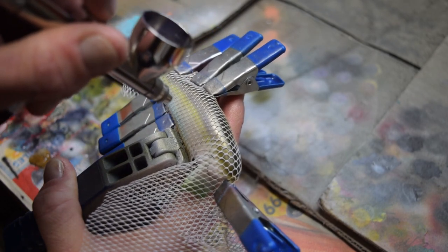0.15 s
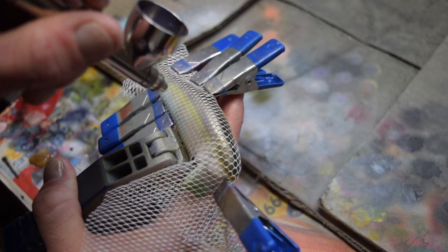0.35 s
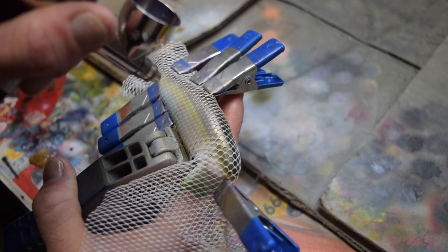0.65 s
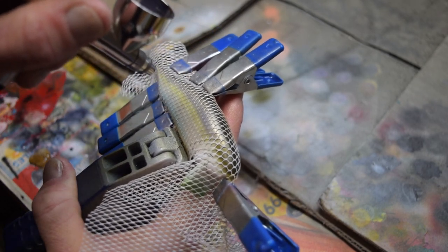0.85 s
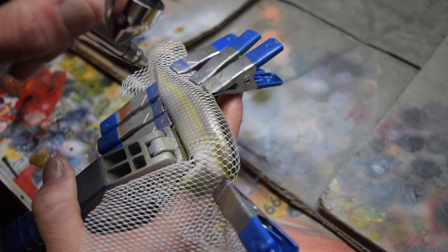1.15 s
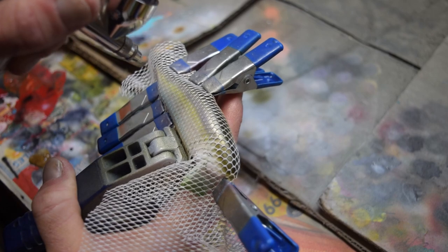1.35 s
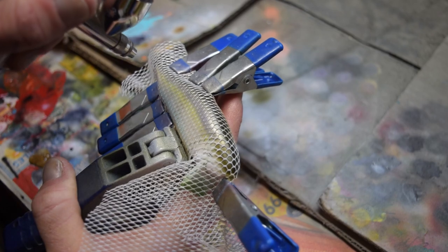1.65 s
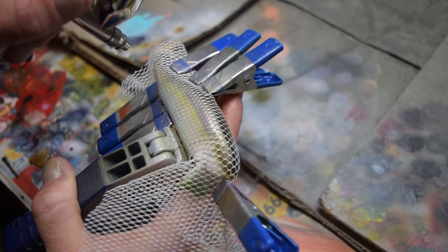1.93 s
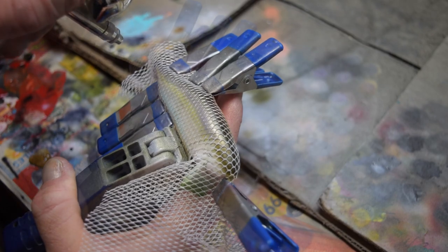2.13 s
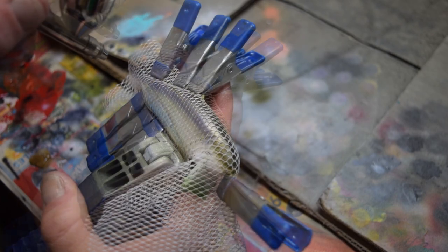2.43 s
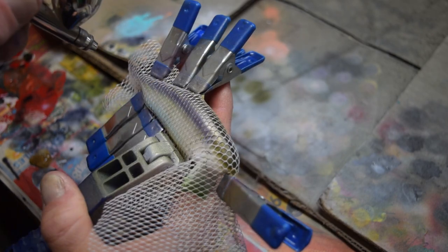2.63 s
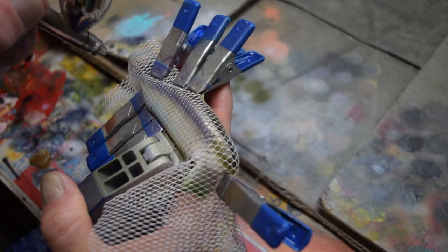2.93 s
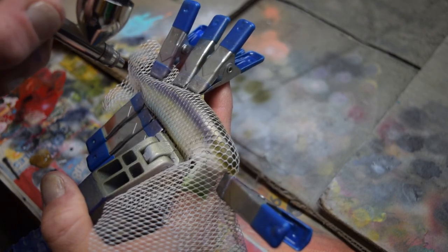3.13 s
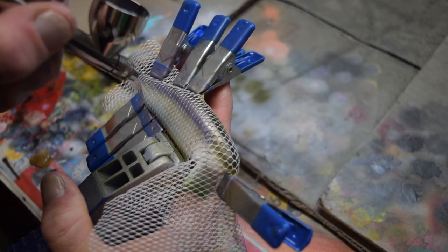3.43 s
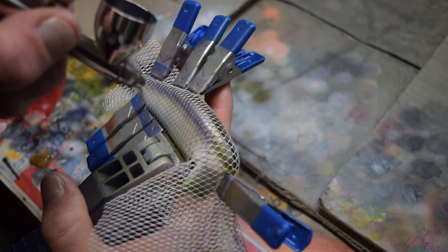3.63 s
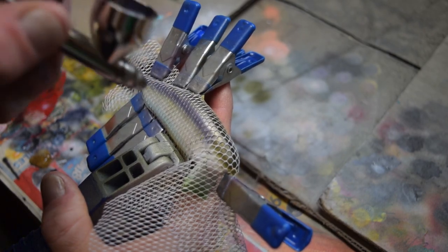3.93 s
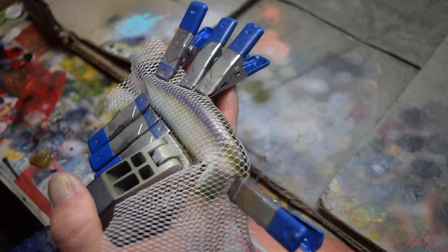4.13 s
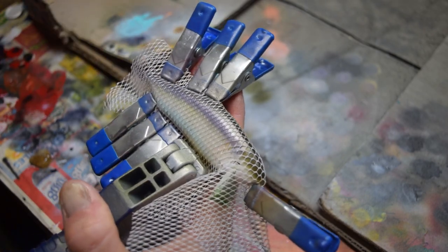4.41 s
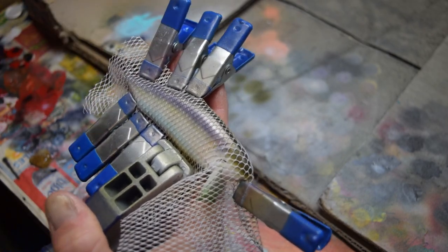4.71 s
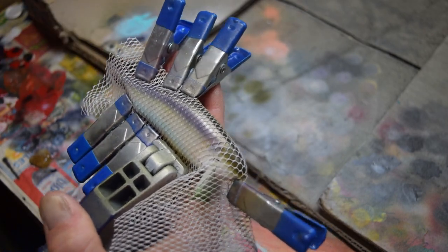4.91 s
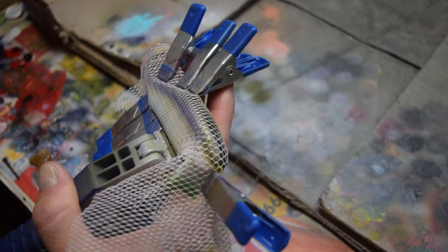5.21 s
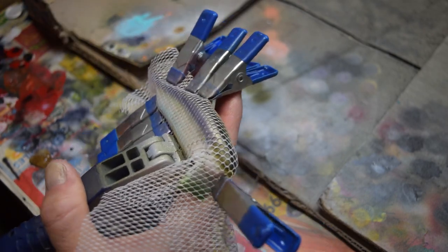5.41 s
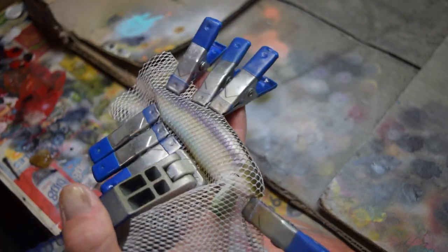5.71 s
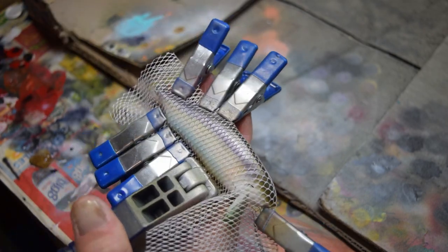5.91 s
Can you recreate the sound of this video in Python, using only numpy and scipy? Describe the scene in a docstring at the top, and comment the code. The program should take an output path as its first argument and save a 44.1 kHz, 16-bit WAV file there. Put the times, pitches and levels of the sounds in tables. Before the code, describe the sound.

Close airbrush spray rushes and wavers against a mesh-covered lure and metal clamps, then cuts off while a small compressor keeps buzzing steadily.

```python
"""At first an airbrush spray, a piston compressor chugging nearby and the workshop all swirl, wide and phasey.
Just before one second the sound snaps to the centre, louder and brighter: shaped noise hisses at the nozzle,
and a lower noise rushes where the jet strikes a mesh-wrapped lure and its clamps, following the aim.
Just before four seconds the trigger is let go. A thin hiss lingers, and the compressor runs on alone:
harmonics of its shaft, noise puffed through the valves, buzzing fittings and loose metal over hum and room noise."""
import sys
import numpy as np
from scipy import signal
from scipy.fft import rfft, irfft
from scipy.io import wavfile
from scipy.ndimage import uniform_filter1d

SR = 44100
rng = np.random.default_rng(int(sys.argv[2]) if len(sys.argv) > 2 else 0)


def store_pcm(level_fs):
    """Save levels as 16-bit WAV."""
    pcm = np.round(np.clip(level_fs, -1, 1) * 32767).astype(np.int16)
    wavfile.write(sys.argv[1], SR, np.atleast_2d(pcm).T)


N = 267246
T = np.arange(N) / SR  # s
FRAME_T, BIN_HZ = np.arange(N // 256 + 5) * 256 / SR, np.fft.rfftfreq(1024, 1 / SR)  # s, Hz
SNAP_S, RELEASE_S = .918, 3.931  # the sound snaps to the centre; the trigger is let go


def amp(db):
    """Decibels to gain."""
    return 10 ** (np.asarray(db) / 20)


def unit(x):
    """Scales to an rms of 1."""
    return x / np.sqrt(np.mean(x ** 2) + 1e-20)


def curve(rows, t):
    """Joins (t/s, value) rows by straight lines."""
    return np.interp(t, *np.transpose(rows))


def during(t, start, end, fade):
    """1 between start and end, with linear fades centred on both."""
    return np.clip(np.minimum(t - start, end - t) / fade + .5, 0, 1)


def shape(points):
    """Gain per bin of a spectrum given as (f/Hz, level/dB) points."""
    hz, db = np.transpose(points)
    return amp(np.interp(np.log(BIN_HZ + 1), np.log(hz), db))


def noise(gain):
    """Noise of unit power, coloured by a gain per bin, or per frame and bin."""
    real, imaginary = rng.standard_normal((2, len(FRAME_T), len(BIN_HZ)))
    spectrum = (real + 1j * imaginary) * gain
    return unit(signal.istft(spectrum.T, nperseg=1024, noverlap=768)[1][:N])


def wander(hz):
    """Smooth random drift of unit rms, with a Gaussian roll-off that reaches 1/e at hz."""
    roll_off = np.exp(-(np.fft.rfftfreq(N, 1 / SR) / hz) ** 2)
    return unit(irfft(rfft(rng.standard_normal(N)) * roll_off, N))


STEP_FADE_S = .006  # length of the step in level at the snap


def centred():
    """Rises from 0 to 1 as the sound snaps to the centre."""
    return np.clip((T - SNAP_S) / STEP_FADE_S + .5, 0, 1)


# air through the nozzle, before its gain: t/s, level/dB
JET = [(0.94, -42.5), (1.26, -42), (2.13, -45), (2.32, -45.5), (2.56, -40.5), (3.05, -41), (3.13, -41.5),
       (3.92, -41)]
# how squarely the jet strikes the work, as the rush before its gain: t/s, level/dB
AIM = [(0.94, -39.5), (1.26, -38.5), (1.4, -37.5), (1.67, -39.5), (1.82, -34.5), (2.09, -36), (2.27, -48.5),
       (2.59, -36), (2.75, -47), (2.85, -40.5), (2.91, -35), (3.09, -38), (3.4, -40.5), (3.49, -44.5),
       (3.83, -46), (3.92, -47)]
# spectrum of the nozzle's hiss: f/Hz, relative level/dB
NOZZLE = [(100, -19), (500, -8.5), (1000, 3), (2500, -10), (4500, -17.5), (6200, -9), (7600, -2),
          (9500, -9), (11200, -6.5), (12300, -5), (13400, -0.5), (14600, -8.5), (16000, -3.5)]
# spectrum of the rush on the work: f/Hz, relative level/dB
RUSH = [(60, -14.5), (200, -16.5), (420, -13.5), (700, -9.5), (1000, 2.5), (1350, 2.5), (1550, -9.5),
        (1850, 2.5), (2600, -0.5), (3300, -2), (4800, -3.5), (6300, -8), (9000, -22), (16000, -16)]
# spectrum of the rush's bright edge: f/Hz, relative level/dB
EDGE = [(2000, -26.5), (4500, -2), (6200, -4.5), (7600, -4.5), (9000, -1), (11000, -6.5), (16000, -22)]
# the jet catches an edge of the mesh: t/s, length/s, extra level/dB of the rush
SPURTS = [(1.382, 0.0036, 4), (1.456, 0.0069, 2), (2.987, 0.0026, 5.5)]
HISS_GAIN_DB, RUSH_GAIN_DB = 4.5, 1.5
# the bright edge follows the aim late and less deeply: level at the best aim (dB), share, lag (s)
EDGE_DB, EDGE_FOLLOW, EDGE_LAG_S = -39, 0.8, 0.033
# the quieter spray before the snap: changes of level (dB), sag (dB/s), and where the rush loses its treble (Hz)
EARLY_JET_DB, EARLY_RUSH_DB, EARLY_EDGE_DB = -1.5, -3, -6.5
EARLY_SAG_DB_PER_S, EARLY_DULL_HZ = 2, 4470
SHUT_S = .009  # the valve shuts to 1/e in this time


def airbrush():
    """Nozzle hiss, plus the turbulent rush of the jet on the work, both cut off by the air valve."""
    colour, early = work_colour(), 1 - centred()
    dull = 1 / np.sqrt(1 + np.outer(FRAME_T < SNAP_S, (BIN_HZ / EARLY_DULL_HZ) ** 6))

    hiss = noise(shape(NOZZLE)) * amp(curve(JET, T) + HISS_GAIN_DB + EARLY_JET_DB * early)
    rush_db = curve(AIM, T) + RUSH_GAIN_DB + EARLY_RUSH_DB * early
    rush = noise(shape(RUSH) * colour * dull) * amp(rush_db)
    late_aim_db = curve(AIM, T - EDGE_LAG_S)
    edge_db = EDGE_DB + EDGE_FOLLOW * (late_aim_db - late_aim_db.max()) + EARLY_EDGE_DB * early
    edge = noise(shape(EDGE) * colour) * amp(edge_db)

    flutter_db = 0.41 * wander(hz=45) + 0.37 * wander(hz=410)  # eddies and paint droplets
    for start, length, db in SPURTS:
        flutter_db += db * np.exp(-((T - start) / length) ** 2)
    spray = hiss * amp(0.64 * flutter_db) + (rush + edge) * amp(flutter_db)

    sag = amp(EARLY_SAG_DB_PER_S * (SNAP_S / 2 - T) * early)
    valve = np.exp(-np.maximum(T - RELEASE_S, 0) / SHUT_S)
    return sag * valve * bench(spray)


# ringing gaps between lure and clamps: f/Hz, half width/Hz at 1/e, level/dB at the peak
GAP_MODES = [(2640, 123, 3), (3977, 150, 5), (4960, 160, 2.5), (5640, 170, 5), (7400, 510, 4.5)]
NOTCH_SPACING_HZ, CLOSE_ECHO = 1560, .33  # short echo close on the lure: notch spacing, gain
# a square hit roars around one pitch: centre, half width at 1/e, gain for each dB of aim
ROAR_HZ, ROAR_WIDTH_HZ, ROAR_PER_DB = 2800, 600, 0.33


def work_colour():
    """Gain per frame and bin: notches close on the lure, ringing gaps elsewhere, a roar that grows with the aim."""
    close, aim_db = close_on_lure(FRAME_T)[:, None], curve(AIM, FRAME_T)
    notches = abs(1 - CLOSE_ECHO * close * np.exp(-2j * np.pi * BIN_HZ / NOTCH_SPACING_HZ))
    ring_db = sum(db * np.exp(-((BIN_HZ - hz) / width) ** 2) for hz, width, db in GAP_MODES)
    roar_band = np.exp(-((BIN_HZ - ROAR_HZ) / ROAR_WIDTH_HZ) ** 2)
    roar_db = ROAR_PER_DB * np.outer(aim_db - aim_db.mean(), roar_band)
    return notches * amp((1 - close) * (ring_db + roar_db))


def close_on_lure(t):
    """Rises to 1 while the jet plays close on the lure."""
    return during(t, start=1, end=1.3, fade=0.3)


def bench(x, echo_db=-15, count=14):
    """Early echoes from hand and bench, within 14 ms, put a fine ripple on the spray."""
    taps = np.zeros(round(.014 * SR))
    at = rng.integers(len(taps) // 10, len(taps), count)
    taps[at] = rng.choice([-1, 1], count) * amp(echo_db) / np.sqrt(count)
    taps[0] = 1  # direct sound
    return signal.oaconvolve(x, taps / np.linalg.norm(taps))[:N]


LINGER_DB, LINGER_HZ, LINGER_WIDTH_HZ = -70, 7950, 250  # level, centre, half width at half amplitude
LINGER_S, LINGER_FADE_S = .33, .1


def linger():
    """A thin, high band of noise that hangs on for a moment after the spray stops."""
    thin = noise(1 / (1 + ((BIN_HZ - LINGER_HZ) / LINGER_WIDTH_HZ) ** 2))
    return amp(LINGER_DB) * thin * during(T, RELEASE_S, RELEASE_S + LINGER_S, fade=LINGER_FADE_S)


# compressor shaft: t/s, f/Hz (turns per second)
SPEED = [(0, 27.18), (2.3, 27.18), (2.6, 27.205), (4.2, 27.205), (4.87, 27.176), (5.5, 27.165)]


def shaft_turns():
    """Turns of the shaft so far: its speed summed over time, with a slight waver."""
    return np.cumsum(curve(SPEED, T)) / SR + .0005 * wander(hz=13)


# piston and valve knocks within one turn: share of the turn, relative level/dB
KNOCKS = [(.094, -7), (.2411, -15), (.3286, 0), (.4175, -8), (.5406, 0), (.8044, -13)]


def knock_spectrum(order):
    """What the knocks of one turn give to each multiple of the shaft speed."""
    return sum(amp(db) * np.exp(-2j * np.pi * order * at) for at, db in KNOCKS)


def each_turn(harmonics, turns, size=2048):
    """Plays the same stroke, given by its harmonics, once per turn of the shaft."""
    stroke = irfft(harmonics, size) * size / 2
    return np.interp(turns % 1 * size, np.arange(size + 1), np.append(stroke, stroke[0]))


# tones of the compressor: multiple of the shaft speed, level/dB (peak, before the pump's gain)
ORDERS = [(1, -69), (2, -63.5), (3, -57.5), (7, -65.5), (8, -71.5), (10, -62.5), (19, -80), (21, -59),
          (22, -72.5), (24, -63), (26, -71.5), (28, -62), (30, -56.5), (31, -61), (32, -81), (33, -60),
          (34, -89), (35, -50.5), (36, -54.5), (37, -56.5), (38, -49.5), (39, -55), (41, -58), (42, -52.5),
          (43, -53), (44, -53), (45, -54.5), (46, -65), (47, -64), (48, -58.5)]
WEAK_ORDER_DB, PUMP_GAIN_DB = -76, 1.5  # level of the unlisted multiples; gain of all tones
BODY_HZ, BODY_WIDTH_HZ = 1030, 120  # main resonance that the knocks excite
SOFT_KNOCK_DB = -7  # change of the highest tone at the start


def pump(turns, count=48):
    """Knocks in a ringing body time the shaft's harmonics, which harden steadily while air is drawn off."""
    order, levels = np.arange(count + 1), dict(ORDERS)
    body = 1 / (1 + 2j * (order * SPEED[0][1] - BODY_HZ) / BODY_WIDTH_HZ) ** 2
    level = amp([levels.get(k, WEAK_ORDER_DB) for k in order]) * (order > 0)
    hard = level * np.exp(1j * np.angle(knock_spectrum(order) * body))
    soft = hard * amp(SOFT_KNOCK_DB * order / count)
    softness = np.maximum(1 - T / RELEASE_S, 0)
    tones = softness * each_turn(soft, turns) + (1 - softness) * each_turn(hard, turns)
    return tones * amp(PUMP_GAIN_DB + .1 * wander(hz=25))


# ringing of the compressor's housing: f/Hz, width/Hz, relative level/dB
HOUSING = [(975, 108, -2.5), (1236, 49, -5), (1724, 34, -1.5), (2208, 69, -9), (2490, 56, -13.5),
           (2680, 45, -25.5), (2975, 66, -23), (3820, 114, -15.5), (5240, 230, -23), (7900, 400, -32)]
RING_DB, RING_WAVER = -57, 0.0028  # level; waver of the timing (turns, rms)


def housing_ring(turns, count=120):
    """The same knocks ring the upper modes of the housing, alike on every turn."""
    order = np.arange(count)
    modes = sum(amp(db) / (1 + 2j * (order * SPEED[0][1] - hz) / width) for hz, width, db in HOUSING[2:])
    above_pump = order > ORDERS[-1][0]
    ring = knock_spectrum(order) * modes * above_pump
    return amp(RING_DB) * unit(each_turn(ring, turns + RING_WAVER * wander(hz=9.7)))


# air puffed through the valves: f/Hz, relative level/dB
PUFF = [(1200, 2.5), (1700, -3.5), (2600, -1), (3800, 1.5)]
CLATTER_DB, PUFF_SWELL = -51.5, 0.12  # level; swell within a turn (share)


def clatter(turns):
    """Each stroke swells a noise of air through the valves, coloured by the ringing housing."""
    puff = 1 + PUFF_SWELL * np.cos(2 * np.pi * (turns - .53))
    power = sum(amp(db) ** 2 / (1 + (2 * (BIN_HZ - hz) / width) ** 2) ** 1.58 for hz, width, db in HOUSING)
    return amp(CLATTER_DB) * unit(noise(np.sqrt(power) * shape(PUFF)) * puff)


# buzz of the fittings: f/Hz, relative level/dB
RATTLE = [(2500, -32), (4000, -15), (5200, -5), (6500, 0), (8200, 1.5), (10000, -10), (16000, -9.5)]
RATTLE_DB = -68.5


def rattle(turns, spread_db=3.0):
    """Fittings buzz after each stroke, by a chance amount, and die away until the next."""
    stroke, since = np.divmod(turns + .62, 1)
    size = amp(spread_db * np.clip(rng.standard_normal(int(stroke.max()) + 1), -2, 2))
    strokes = size[stroke.astype(int)] * np.exp(-since / 0.55)
    return amp(RATTLE_DB) * unit(noise(shape(RATTLE)) * strokes)


# a brief puff of thin hiss near 8 kHz, then chatter now and then: t/s, level/dB before the decay, f/Hz
CHATTER = [(4.128, -60, 8000), (4.313, -56, 5250), (4.571, -55, 5200), (4.683, -60, 8200),
           (4.752, -59, 5300), (4.868, -56, 7900), (4.937, -57, 5500), (5.563, -51, 5200),
           (5.841, -55, 5230)]
CHATTER_T60_S = .09  # time to fall by 60 dB


def chatter():
    """A puff of thin hiss, then gritty chatter of loose metal: narrow noise, fast attack, steady decay in dB."""
    out = np.zeros(N)
    for start, db, hz in CHATTER:
        age = np.maximum(T - start, 0)
        burst = noise(1 / (1 + ((BIN_HZ - hz) / 220) ** 2))
        attack = 1 - np.exp(-age / 0.00064)
        out += burst * amp(db - 60 * age / CHATTER_T60_S) * attack
    return out


# steady hum in the workshop: f/Hz, level/dB (rms, before the background's step)
HUM = [(93.3, -64.5), (120, -79)]
# noise of the room: f/Hz, relative level/dB
ROOM = [(25, -23), (100, -4.5), (170, 2.5), (270, 2), (350, -2.5), (750, 2.5), (1100, 3.5), (1450, -7),
        (2500, -6.5), (3300, -11), (5400, -13), (6600, -20), (8300, -19), (10000, -23), (16000, -27)]
ROOM_DB = -52


def workshop():
    """Steady low sine hum over the shaped noise of the room."""
    hum = sum(amp(db) * np.sqrt(2) * np.sin(2 * np.pi * (hz * T + rng.random())) for hz, db in HUM)
    return hum + amp(ROOM_DB) * noise(shape(ROOM))


# gliding bands that turn hollow: from t/s, to t/s, f/Hz at mid-time, half width/Hz at 1/e, glide/(Hz per s)
HOLLOW = [(0.046, 0.21, 486, 544, -2500), (0.42, 0.55, 4400, 447, -0.5), (0.521, 0.647, 201, 490, 0),
          (0.645, 0.75, 6460, 700, -6000), (0.667, 0.913, 1070, 357, 1200)]
HOLLOW_FADE_S = 0.041
SWIRL_RADIANS = 1.67  # bound on the main phase drift between left and right


def swirl(x):
    """Left and right drift apart in phase, band by band, until the whole sound snaps to the centre."""
    hz, t, z = signal.stft(x, SR, nperseg=1024, noverlap=768)
    drift = rng.standard_normal(z.shape)
    for _ in range(2):
        drift = uniform_filter1d(uniform_filter1d(drift, size=8, axis=0), size=24, axis=1)
    apart = SWIRL_RADIANS * np.tanh(2.8 * unit(drift)) + 0.12 * unit(drift)
    for start, end, centre, width, glide in HOLLOW:
        offset = (hz[:, None] - centre - glide * (t - (start + end) / 2)) / width
        share = np.exp(-np.square(np.square(offset))) * during(t, start, end, fade=HOLLOW_FADE_S)
        apart = apart + share * (2.85 * np.sign(apart) - apart)  # nearly opposite in the two ears
    before_snap = np.clip((SNAP_S - t) / 0.029 + .5, 0, 1)
    turn = np.exp(.5j * apart * before_snap)
    return signal.istft(np.array([z * turn, z / turn]), SR, nperseg=1024, noverlap=768)[1][:, :N]


BACKGROUND_STEP_DB = 1.5  # compressor and room rise at the snap, from half below to half above their levels
SIDE_HISS_DB = -86.5


def scene():
    """Airbrush, compressor and room, with a very faint, separate noise in left and right."""
    turns = shaft_turns()
    compressor = pump(turns) + housing_ring(turns) + clatter(turns) + rattle(turns) + chatter()
    background = (compressor + workshop()) * amp(BACKGROUND_STEP_DB * (centred() - 0.5))
    mid = airbrush() + linger() + background
    return swirl(mid) + amp(SIDE_HISS_DB) * rng.standard_normal((2, N))


CUT_HZ = 15850


def record(dry):
    """A steep low-pass filter that bounds the band."""
    low_pass = signal.firwin(801, CUT_HZ, window=("kaiser", 9), fs=SR)
    return signal.oaconvolve(dry, low_pass[None], "same")


dry = scene()
out = record(dry)
store_pcm(out)
```